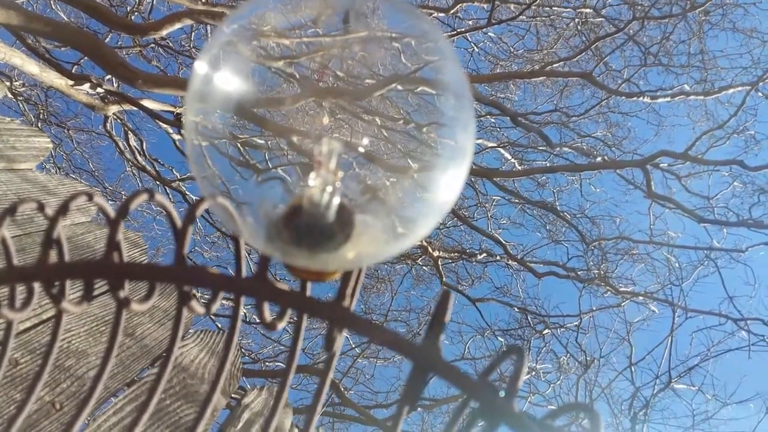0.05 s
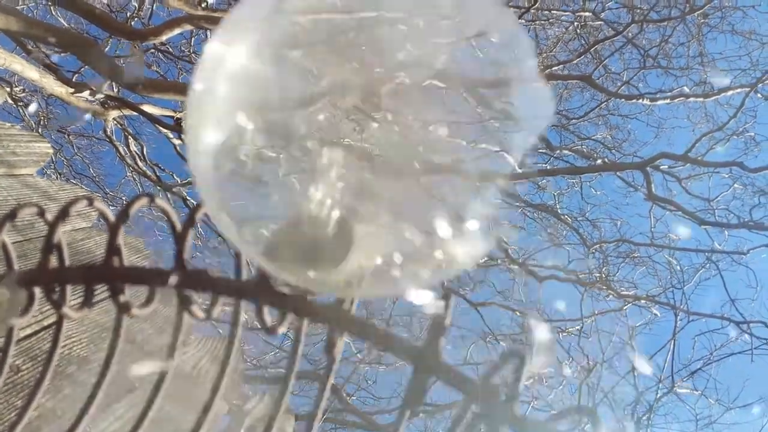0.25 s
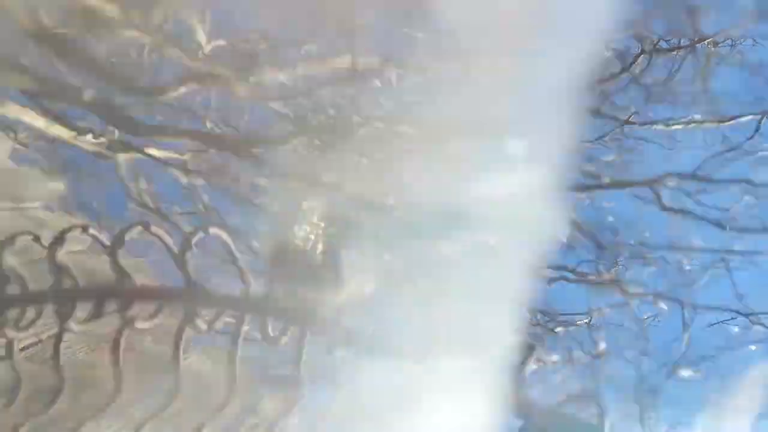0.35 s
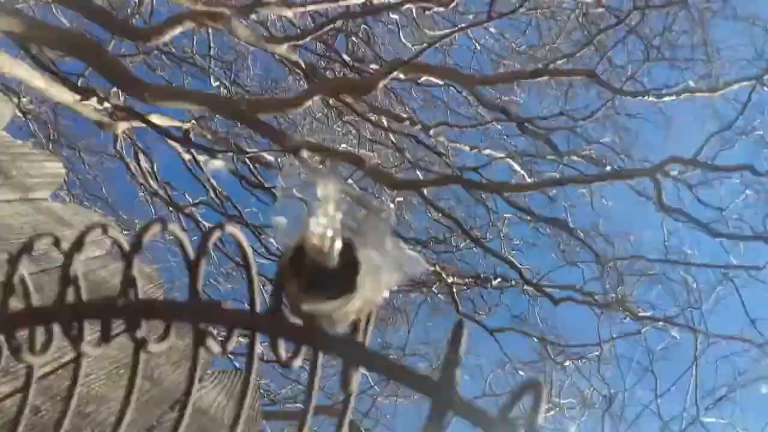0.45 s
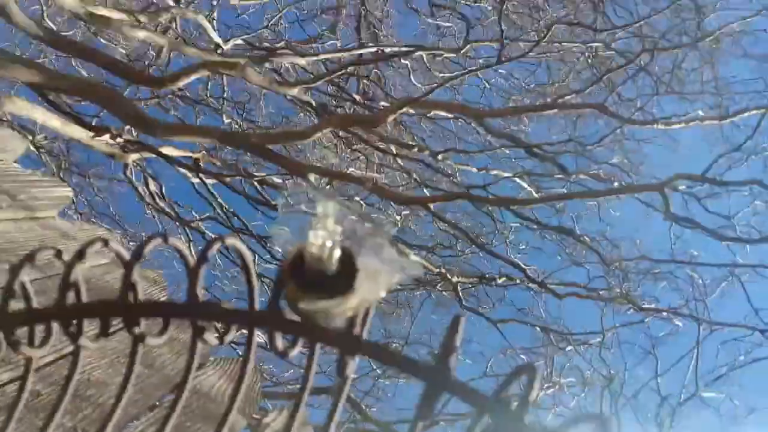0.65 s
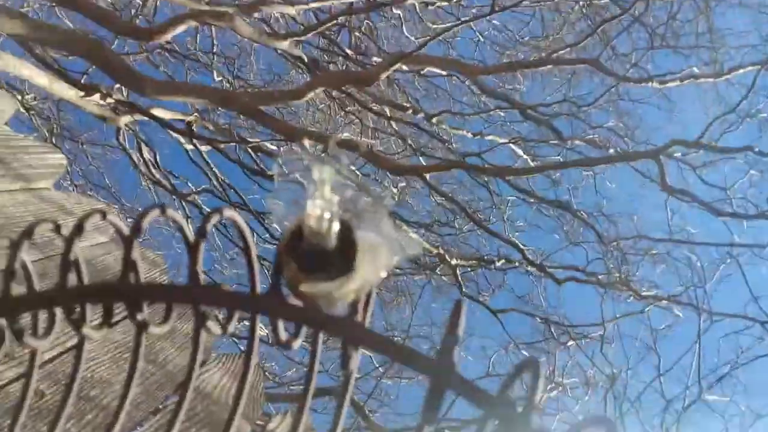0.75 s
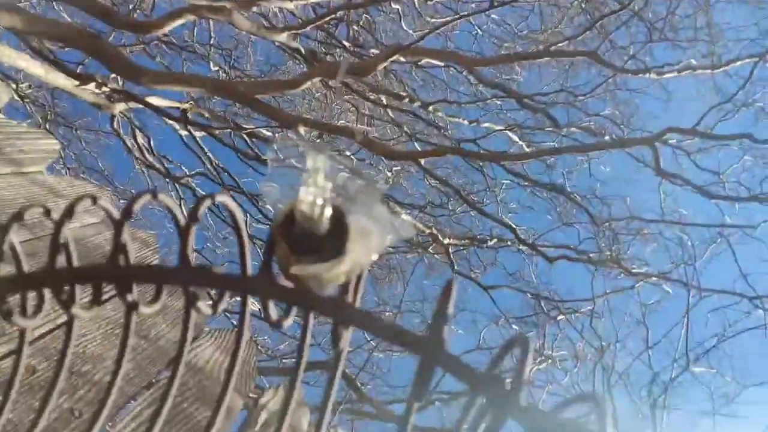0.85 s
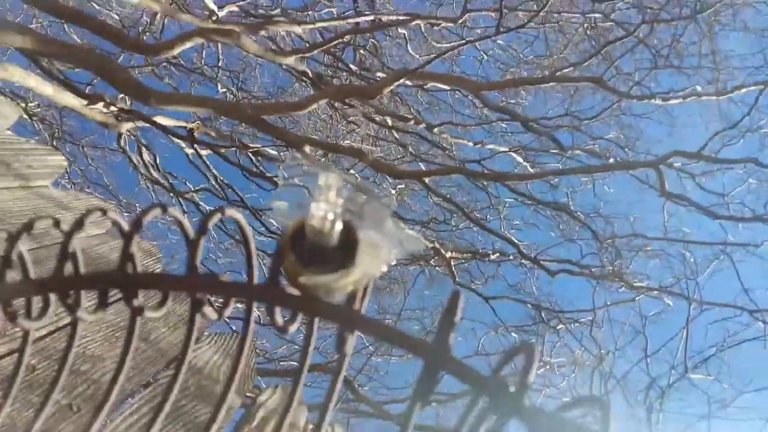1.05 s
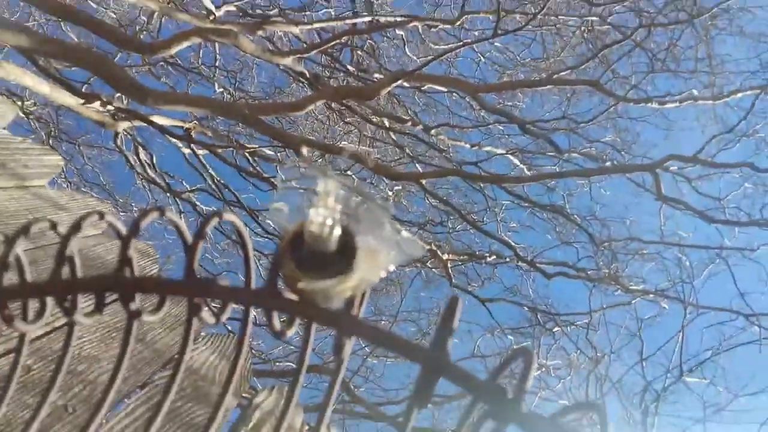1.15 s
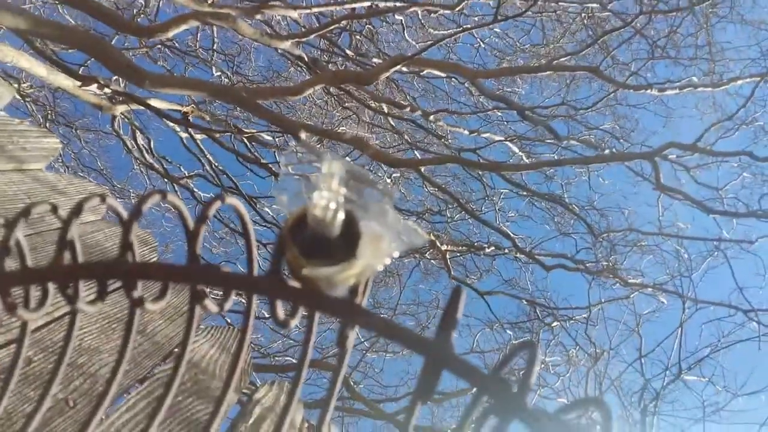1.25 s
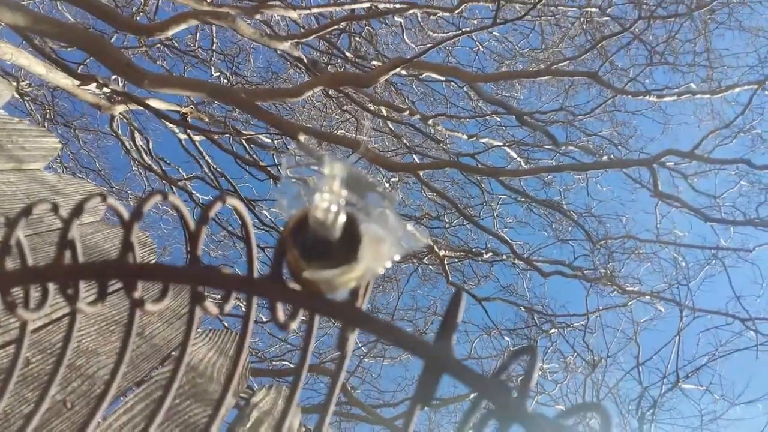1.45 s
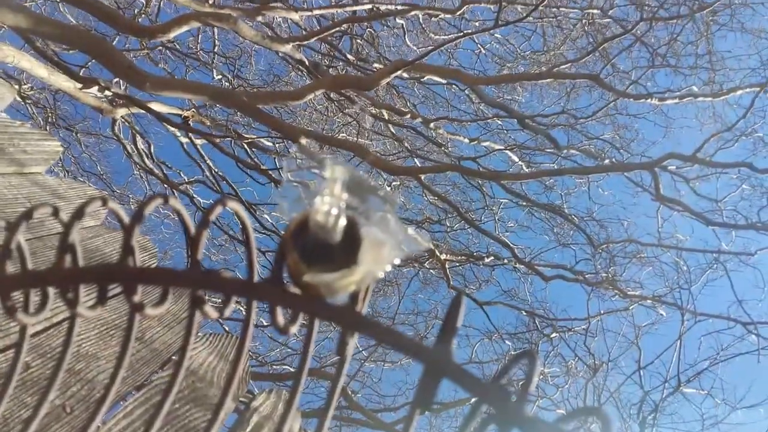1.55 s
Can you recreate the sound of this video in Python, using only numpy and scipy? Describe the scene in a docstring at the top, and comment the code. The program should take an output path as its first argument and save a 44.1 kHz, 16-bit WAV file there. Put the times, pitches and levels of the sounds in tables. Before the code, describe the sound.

A light bulb bursts outdoors, then glass shards clink and a piece rattles.

```python
"""A light wind rumbles outdoors, then a light bulb bursts beside a small stereo camera and overloads it.
The shell cracks, then collapses twice in showers of splinters. Pieces knock on the mount under the
bulb and set it ringing, and small shards clink as they tumble. Last, a curved piece rocks on its rim,
rattling and ringing on to the right."""
import sys
import numpy as np
from scipy import signal
from scipy.fft import rfft, irfft, next_fast_len
from scipy.io import wavfile
from scipy.ndimage import uniform_filter1d

SR = 44100
rng = np.random.default_rng(int(sys.argv[2]) if len(sys.argv) > 2 else 0)


def transcribe(signal):
    """Save signal, clipped to [-1, 1], as a 16-bit WAV file at the path in sys.argv[1]."""
    frames = np.atleast_2d(signal).T
    limited = np.clip(frames, -1, 1)
    pcm = np.round(limited * 32767).astype(np.int16)
    wavfile.write(sys.argv[1], SR, pcm)


N = 70560

# A fade time is how long a sound takes to drop 60 dB. A pan is left minus right, in dB.
# Tone colours of the wind and the air. Each row: frequency in Hz, level in dB.
WIND_TONE = [(20, -7), (45, -19), (75, 3.5), (120, -7.5), (220, -19), (500, -51)]
AIR_TONE = [(20, -2.5), (120, 1.5), (250, -14), (380, -26.5), (470, -16), (560, -38), (820, -19.5),
            (1200, -27), (2300, -32.5), (3500, -47), (5500, -46), (7300, -34.5), (9000, -50),
            (15000, -68.5)]
# Loudness of the wind and the air. Each row: time in seconds, level in dB.
WIND_LEVELS = [(0, -38), (.14, -38.5), (.25, -46), (.7, -61), (1.1, -53), (1.6, -49)]
AIR_LEVELS = [(0, -37), (.23, -45.5), (.45, -45), (1.6, -59.5)]
# Glass breaking and landing. Each row: start and length in seconds, thud and knock levels in dB,
# knock pitch in Hz, crack and glass levels in dB, pan of the body (thud, knock, crack), pan of the glass.
GLASS_BLOWS = [(0.2303, 0.006, -62, -24, 887, -16, -9.5, -3.5, 4.5),
               (0.2568, 0.0034, -40, -3.5, 784, -11, -4.5, 12, 4),
               (.2605, 0.0037, -25.5, -9.5, 465, -16, -5, 8, -5),
               (0.266, 0.0017, -26, -7, 1670, -8.5, -4, 8.5, -1),
               (0.3403, 0.0022, -43, -26, 1100, -16, -12.5, 2.5, -1.5),
               (0.3826, 0.00084, -42, -24, 1090, -31, -15.5, 3, -8.5),
               (0.3945, 0.00092, -19.5, -58, 514, -17, -9.5, 25.5, 11),
               (.4015, 0.00088, -45, -36, 706, -17, -18, 17.5, 12),
               (0.4097, 0.00083, -51, -33, 910, -27, -25, -5, -12),
               (0.4201, 0.0012, -29.5, -6.5, 1430, -15, -5, 12, -11.5),
               (0.4217, 0.002, -21, -7, 474, -20, -25, 9.5, -1),
               (0.441, 0.0035, -19, -31, 690, -24, -35, -10, -1),
               (0.447, 0.00032, -15.5, -22.5, 980, -15.5, -26, 25, 3),
               (0.4533, 0.00041, -47, -40, 600, -14, -9.5, -8, 0),
               (0.4574, 0.0017, -15.5, -21, 1840, -9, -19, -6, 3),
               (.497, 0.0084, -38, -33, 1330, -23, -29, -4, -12),
               (0.517, 0.0021, -39, -11, 1050, -16.5, -36, 9.5, 10),
               (0.524, 0.0095, -64, -39, 1147, -28.5, -24.5, -12, 4),
               (0.54, 0.0026, -44, -20, 1400, -24, -22, 7, 12),
               (0.547, 0.0015, -54, -25, 1160, -20, -32, 0, 4),
               (0.5666, 0.0038, -45, -23, 1007, -25, -25.5, 12, 12),
               (0.57, 0.0037, -44, -24.5, 492, -33, -36, 3.5, -8),
               (0.586, 0.0032, -60, -39, 1270, -24, -25, 4, 9),
               (.628, 0.0049, -37, -23.5, 1330, -19, -12, 7, 7),
               (.637, 0.0016, -29.5, -41, 700, -30.5, -22.5, 3.5, 8),
               (0.6977, 0.00099, -61, -51, 1200, -24, -29, 14, 7),
               (0.718, 0.0036, -58, -28.5, 1250, -32, -29, 14, 12),
               (0.7246, 0.0068, -50, -36, 594, -30, -22.5, 2, -8.5),
               (0.737, 0.0093, -44.5, -32.5, 963, -33.5, -29, 9, -6),
               (0.755, 0.0056, -41, -40.5, 900, -35.5, -29, 1, -15),
               (.785, 0.0026, -48, -26, 1490, -30.5, -30, 9, -7),
               (0.7907, 0.0045, -57, -38, 482, -35, -19.5, 3, -13.5),
               (0.797, 0.0054, -61, -27.5, 1157, -27, -17, 8.5, 10),
               (0.8753, 0.0015, -23, -39.5, 170, -14.5, -12.5, -12, -11),
               (0.877, 0.0055, -51, -51, 590, -27, -29, 10, -15),
               (0.9034, 0.0054, -42, -62, 786, -49, -21, -15, -14),
               (0.958, 0.00047, -25.5, -28.5, 667, -28.5, -11.5, -23.5, -12),
               (1.24, 0.011, -50, -53.5, 785, -45.5, -56, 3.5, -7),
               (1.308, 0.012, -71, -78, 850, -43.5, -42, -7, -12),
               (1.375, 0.0016, -69, -56, 810, -64, -42, 5, -12)]
# Tone colours of a thud and a crack. Each row: frequency in Hz, level in dB.
THUD_TONE = [(20, -6), (50, 2), (110, 5), (250, 1), (450, -2.5), (1000, -13), (3000, -48)]
CRACK_TONE = [(500, -17), (1300, -2), (2200, 0.5), (3500, -1.5), (5200, -3.5), (7000, -9.5), (15000, -36)]
# Each microphone's bright peak near 7 kHz, heard on the splinters. Each row: frequency in Hz, level in dB.
MIC_LEFT_TONE = [(2500, -57.5), (4800, -9.5), (6300, 3.5), (7200, -4), (8000, -7), (10000, -22),
                 (14500, -21.5)]
MIC_RIGHT_TONE = [(2500, -37.5), (5000, -9.5), (6700, 4), (7500, 6.5), (8400, -1), (10500, -7.5),
                  (14500, -6.5)]
# The mount's natural notes. Each row: pitch in Hz, level in dB, fade time in seconds.
MOUNT_NOTES = [(465, -0.5, 0.13), (689, -16.5, 0.14), (1069, -6.5, 0.32), (1162, -2.5, 0.42),
               (2094, -5, 0.25)]
# Tumbling shards. Each row: start in seconds, pitch in Hz, level in dB, fade time in seconds,
# time in the air in seconds, pan.
SHARDS = [(0.23, 6680, -13, 0.076, 0.0043, -22), (.268, 9500, -22.5, 0.29, 0.098, -4),
          (0.424, 6795, -26.5, .59, 0.19, -10.5), (.57, 6230, -43, 0.29, 0.059, -7),
          (0.574, 7900, -39, 0.37, 0.024, -14), (0.633, 6740, -19, 0.1, 0.037, 12),
          (.635, 4780, -37, 0.69, 0.084, 11), (.637, 9550, -28, 0.22, 0.044, 2),
          (.627, 13700, -38, .2, .038, 14), (0.7483, 7400, -26.5, 0.14, 0.0155, -18.5),
          (.7465, 12630, -37, 0.22, 0.036, -22), (.7465, 13800, -35, 0.26, 0.037, -14),
          (.747, 12400, -38, 0.091, .015, -23), (0.794, 6740, -33.5, 0.43, 0.13, 6),
          (0.901, 7170, -22, .2, 0.024, -15), (0.9029, 7500, -26.5, 0.36, 0.043, -17),
          (0.8995, 14100, -26.5, 0.088, .03, -24), (.902, 11950, -28, 0.079, 0.015, -28),
          (1.006, 6800, -27, .12, .03, -18), (1.02, 5920, -36.5, .36, 0.0388, -22),
          (1.06, 11320, -37.5, 0.22, 0.038, -24.5), (1.101, 6980, -35.5, 0.49, .017, -26),
          (1.1523, 7090, -25, .6, 0.064, -26), (1.1538, 9670, -40, 0.35, 0.047, -23),
          (1.231, 7040, -31.5, 0.12, 0.014, -35), (1.315, 4868, -46, 0.81, 0.26, -10),
          (1.3795, 7700, -35, 0.33, .09, -29), (1.3782, 6815, -34.5, 0.89, 0.074, -16.5),
          (1.3792, 10130, -43.5, 0.23, 0.03, -22)]
# Splinter showers. Each row: start and fade time in seconds, dull and bright levels in dB,
# dull pan, bright pan.
SPLINTER_SHOWERS = [(0.239, 0.59, -31, -21, 4, -10), (0.265, 0.15, -17.5, -22.5, -5, -15),
                    (0.297, 1, -31, -33.5, -2, -1), (0.422, 0.36, -24, -19, 11, -4.5),
                    (0.574, 1., -37.5, -31, 9.5, 8.5), (0.799, 0.94, -45.5, -38.5, 8, -13)]
# Tone colours of the dull part of the showers and the rattle. Each row: frequency in Hz, level in dB.
DULL_SHOWER_TONE = [(50, -7.5), (200, -5.5), (450, 10.5), (700, -3.5), (1100, 6.5), (1600, 1.5),
                    (3000, 1.5), (5000, 0.5), (7000, -14), (15000, -20.5)]
DULL_RATTLE_TONE = [(250, -14.5), (470, 5), (650, -10.5), (1200, -6.5), (2100, 2), (2800, 8.5), (3900, 0),
                    (5200, -2), (7000, -1.5), (15000, -32)]
# The curved piece's natural notes: one list of pitches in Hz, one of their levels in dB.
PIECE_HZ = [479, 1986, 2137, 2509, 3289, 3424, 4242, 4868, 5245, 5965, 6819, 7106, 7128, 7203, 7360, 7510,
            7742, 8650, 9700, 10150, 11350, 12312, 13140, 14139]
PIECE_DB = [-25.5, -26, -23, -29.5, -20, -25, -18.5, -13, -16, -11, -19, -2, -8, 2, -6, -15, -16, -21.5,
            -14, -21.5, -23.5, -21, -33, -16]
# Its rattle. Each row: time in seconds, then levels in dB of the ring, bright jingle and dull jingle.
RATTLE_LEVELS = [(.875, -44, -22.5, -25.5), (.925, -30, -35.5, -43.5), (.95, -37.5, -32.5, -43.5),
                 (1.015, -33, -32.5, -42), (1.08, -38, -37, -43), (1.125, -30, -30, -40.5),
                 (1.2, -40, -37, -60), (1.24, -41.5, -34.5, -46), (1.29, -43.5, -37, -49.5),
                 (1.34, -40.5, -36.5, -47.5), (1.4, -47.5, -38, -55.5), (1.46, -40.5, -46.5, -61.5),
                 (1.48, -41, -48, -56.5), (1.55, -45, -47, -62), (1.6, -48, -52.5, -60)]

TUMBLE_HZ = 90.76  # how quickly the level of moving glass flutters


def undb(db):
    """Turn decibels into a number to multiply by."""
    return 10 ** (np.asarray(db) / 20)


def unit(x):
    """Scale each channel to an average (rms) level of 1."""
    return x / np.sqrt(np.mean(x ** 2, axis=-1, keepdims=True) + 1e-20)


def pan(db):
    """Left and right gains; positive dB leans left."""
    return undb(np.array([[db], [-db]]) / 2)


def curve(rows, column=1):
    """A gain that glides between a table's levels over time."""
    rows = np.array(rows)
    return undb(np.interp(np.arange(N) / SR, rows[:, 0], rows[:, column]))


def colour(x, points):
    """Filter a sound to give it a tone colour."""
    n = next_fast_len(x.shape[-1] // 2 + 1024) * 2
    hz, db = np.array(points, float).T
    log_hz = np.log(np.arange(n // 2 + 1) * SR / n + 1)
    cepstrum = irfft(np.log(undb(np.interp(log_hz, np.log(hz), db))))
    # Folding this in half stops the filter from sounding before a hit.
    cepstrum[1:n // 2] *= 2
    cepstrum[n // 2 + 1:] = 0
    return irfft(rfft(x, n) * np.exp(rfft(cepstrum)), n)[..., :x.shape[-1]]


def noise(n, shared):
    """Stereo noise; shared (0 to 1) says how alike the sides are."""
    hiss = rng.standard_normal((3, n))
    return np.sqrt(shared) * hiss[2] + np.sqrt(1 - shared) * hiss[:2]


def wobble(hz):
    """A smooth random wobble, about 1 in size."""
    step = max(int(SR / hz), 2)
    zigzag = np.interp(np.arange(N) / step, np.arange(N), rng.standard_normal(N))
    return unit(uniform_filter1d(zigzag, step // 2))


def resonate(hits, hz, fade_s):
    """One note that rings after each hit; .imag of the result is the sound."""
    pole = np.exp((2j * np.pi * hz - np.log(1000) / fade_s) / SR)
    return signal.lfilter([1], [1, -pole], hits)


def add(out, start, x):
    """Mix a sound in at its start time in seconds."""
    i = int(start * SR)
    out[:, i:i + x.shape[-1]] += x[:, :N - i]


def outdoors():
    """Wind rumbles unevenly under a faint wash of air."""
    wind = unit(colour(noise(N, shared=0.96), WIND_TONE)) * undb(2 * wobble(hz=9.2))
    bass_cut = signal.butter(2, 169, "high", fs=SR, output="sos")
    air = signal.sosfilt(bass_cut, colour(noise(N, shared=0.18), AIR_TONE))
    return wind * curve(WIND_LEVELS) + unit(air) * curve(AIR_LEVELS)


def mic_brightness(x):
    """Give a sound each microphone's bright peak near 7 kHz."""
    return np.array([colour(x[0], MIC_LEFT_TONE), colour(x[1], MIC_RIGHT_TONE)])


def blows():
    """Each blow is a thud and a pitched knock in the mount, a crack and a splash of glass."""
    out, t = np.zeros((2, N)), np.arange(4096) / SR
    push = unit(colour(1. * (t == 0), THUD_TONE))
    wander_octaves, left_lag_s = 0.3, 0.00029

    def envelope(length, fade_s):
        """Hold, then fade; longer blows fade more slowly."""
        return undb(-60 * np.maximum(t - length, 0) / (fade_s + 1.8 * length))

    def burst(length, shape, shared):
        """A short puff of coloured noise."""
        fade = envelope(length, fade_s=0.0039)
        return unit(shape(noise(len(t), shared) * fade)) * np.sqrt(np.mean(fade ** 2))

    for start, length, thud_db, knock_db, hz, crack_db, glass_db, body_pan, glass_pan in GLASS_BLOWS:
        cycles = np.cumsum(hz * 2 ** (wander_octaves * wobble(hz)[:len(t)])) / SR
        knock = np.sqrt(2) * np.sin(2 * np.pi * cycles) * envelope(length, fade_s=0.0059)
        thud = push * np.sqrt(np.mean(envelope(length, 0.0077) ** 2))  # longer blows push harder
        low = undb(thud_db) * thud + undb(knock_db) * knock
        low_left = np.interp(t - left_lag_s, t, low, left=0)  # reaches the left microphone later
        crack = undb(crack_db) * burst(length, lambda x: colour(x, CRACK_TONE), shared=0.13)
        splash = undb(glass_db) * burst(length, mic_brightness, shared=0.041)
        body = np.array([low_left, low]) + crack
        add(out, start, body * pan(body_pan) + splash * pan(glass_pan))
    return out


def mount(hits):
    """The blows set the mount ringing briefly."""
    return undb(-59) * sum(undb(db) * resonate(hits, hz, fade_s).imag for hz, db, fade_s in MOUNT_NOTES)


def clinks():
    """A tumbling shard rings at two close pitches, fluttering in level, until landing stops it."""
    out, t = np.zeros((2, N)), np.arange(SR // 4) / SR
    rise_s, landing_s, max_split_hz, twin_db, flutter_db = 0.0008, 0.0013, 131, -7, 3
    for start, hz, db, fade_s, flight_s, pan_db in SHARDS:
        fade = undb(-60 * t / fade_s) * np.minimum(t / rise_s, 1)
        landing = np.exp(-np.maximum(t - flight_s, 0) / landing_s)
        twin_hz = hz + max_split_hz * rng.uniform(0.2, 1) * rng.choice([-1, 1])
        tone = sum(gain * np.sqrt(2) * np.sin(2 * np.pi * (pitch * t + rng.random((2, 1))))
                   for pitch, gain in [(hz, 1), (twin_hz, undb(twin_db))])
        level = undb(db + flutter_db * wobble(TUMBLE_HZ)[:len(t)])
        add(out, start, tone * fade * landing * level * pan(pan_db))
    return out


def jingle(fade_s, tick_db, scatter_db, count):
    """Shards land at random moments: each ticks and rings briefly at three pitches of its own."""
    rings, ticks, t = np.zeros((2, N)), np.zeros((2, N)), np.arange(int(fade_s * SR)) / SR
    for slot, dice in enumerate(rng.random((count, 13))):
        start = (slot + dice[0]) / count * (N - 1) / SR
        size = undb(scatter_db * min(-np.log(1 - dice[1]), 3))  # a few land louder
        hz = 300 + 14200 * dice[2:5, None] ** 1.3
        notes = np.sin(2 * np.pi * hz * t) * undb(-60 * t / (fade_s * (.5 + dice[5])))
        strengths = dice[6:12].reshape(2, 3) - .5  # two sides, three notes
        add(rings, start, size * (strengths * hz.T ** .12) @ notes)
        add(ticks, start, size * strengths[:, :1])
    return unit(unit(rings) + undb(tick_db) * unit(ticks))


def showers():
    """Splinters patter down after each collapse and fade away."""
    out, t = np.zeros((2, N)), np.arange(N) / SR
    patter = jingle(fade_s=0.045, tick_db=-1, scatter_db=1.5, count=2200)
    dull, bright = unit(colour(patter, DULL_SHOWER_TONE)), unit(mic_brightness(patter))
    for start, fade_s, dull_db, bright_db, dull_pan, bright_pan in SPLINTER_SHOWERS:
        fade = (t > start) * undb(-60 * abs(t - start) / fade_s)
        out += fade * (undb(dull_db) * pan(dull_pan) * dull + undb(bright_db) * pan(bright_pan) * bright)
    return out


def rattle():
    """The curved piece rocks on its rim: quick taps keep it ringing and stir the shards around it."""
    ring, taps_per_s, flutter_db, drift_db = 0, 400, 3.5, 0.74
    for hz, db in zip(PIECE_HZ, PIECE_DB):
        taps = rng.random(N) < taps_per_s / SR
        note = resonate(taps + 1e-12, hz, fade_s=0.34)
        note /= np.sqrt(abs(uniform_filter1d(abs(note) ** 2, size=900)) + 1e-9)  # even out its level
        stereo = (note * np.exp(2j * np.pi * rng.random((2, 1)))).imag  # random phase on each side
        ring += stereo * undb(db + flutter_db * wobble(TUMBLE_HZ) + drift_db * wobble(hz=6.06))
    ring = unit(ring) * pan(-19.5) * curve(RATTLE_LEVELS, column=1)
    shards = jingle(fade_s=0.12, tick_db=-6, scatter_db=3, count=1100)
    bright = unit(mic_brightness(shards)) * pan(-20) * curve(RATTLE_LEVELS, column=2)
    dull = unit(colour(shards, DULL_RATTLE_TONE)) * pan(-4) * curve(RATTLE_LEVELS, column=3)
    started = np.arange(N) / SR > RATTLE_LEVELS[0][0]
    return started * (ring + bright + dull)


def scene():
    """All the sounds together at the two microphones."""
    hits = blows()
    return hits + mount(hits) + showers() + clinks() + rattle() + outdoors()


def record(dry):
    """The overloaded camera squashes the loudest peaks and cuts the highest treble."""
    clip_hardness, top_hz = 4, 14550
    clipped = dry / (1 + abs(dry) ** clip_hardness) ** (1 / clip_hardness)
    return signal.sosfilt(signal.ellip(8, .2, 60, top_hz, fs=SR, output="sos"), clipped)


dry = scene()
out = record(dry)
transcribe(out)
```